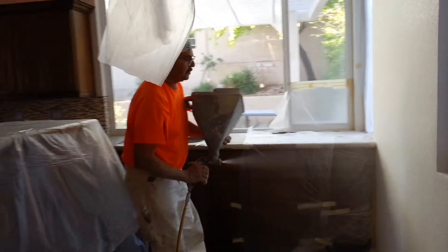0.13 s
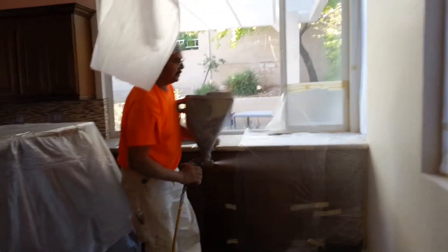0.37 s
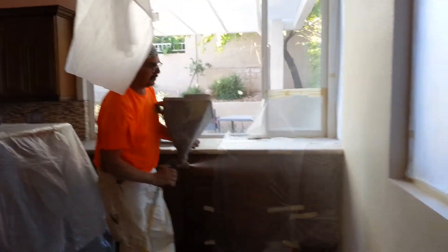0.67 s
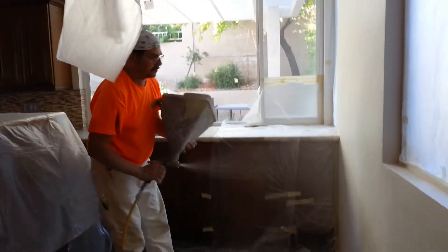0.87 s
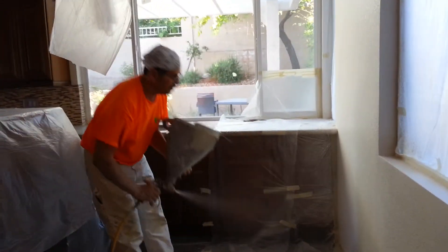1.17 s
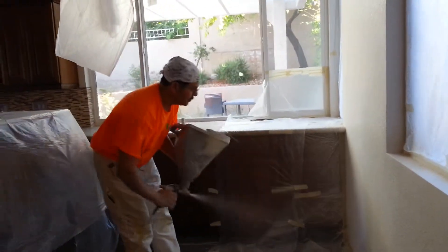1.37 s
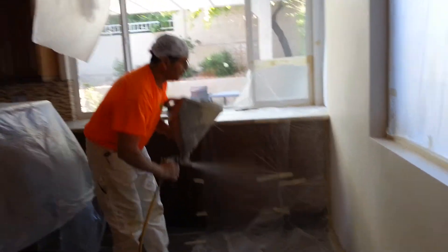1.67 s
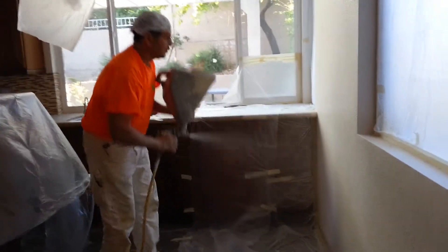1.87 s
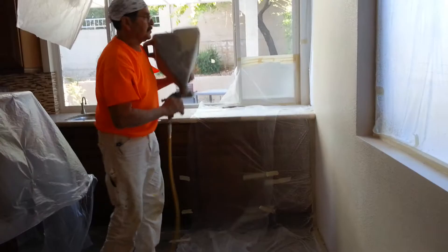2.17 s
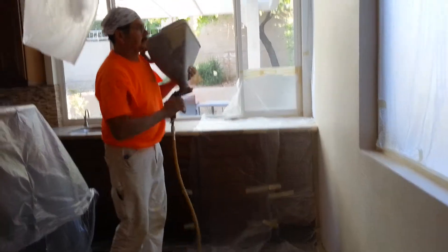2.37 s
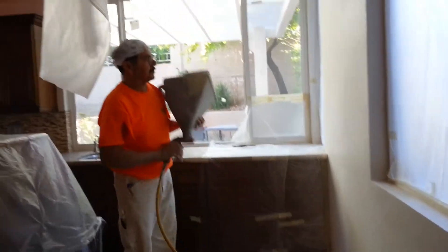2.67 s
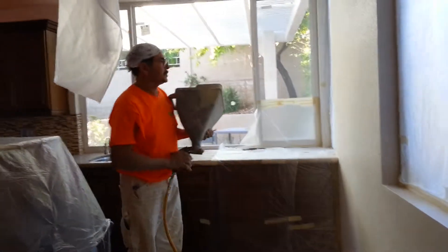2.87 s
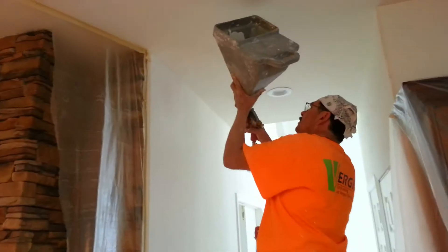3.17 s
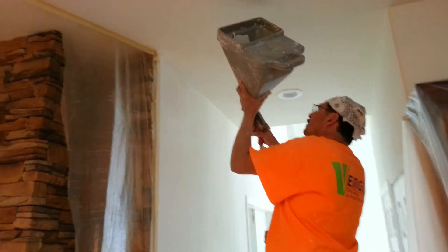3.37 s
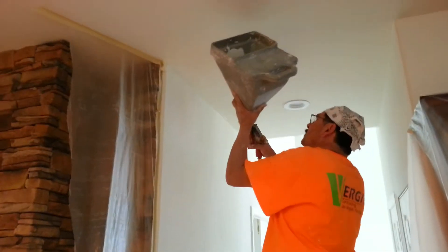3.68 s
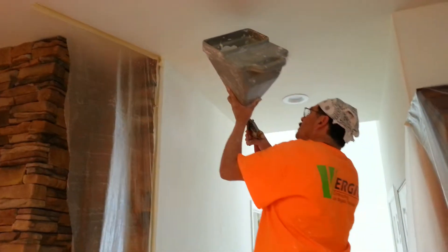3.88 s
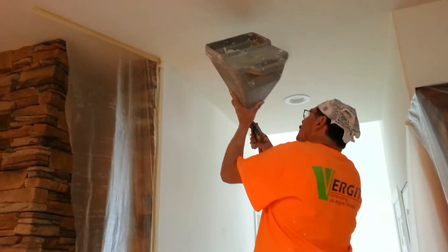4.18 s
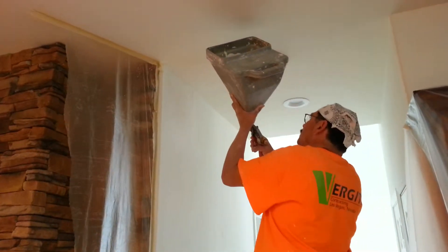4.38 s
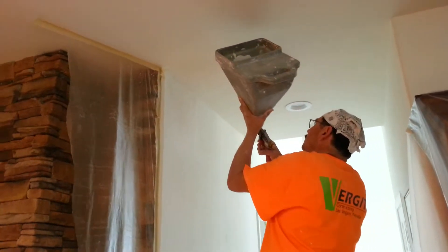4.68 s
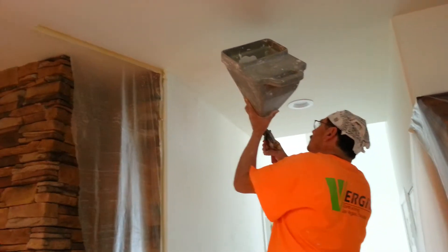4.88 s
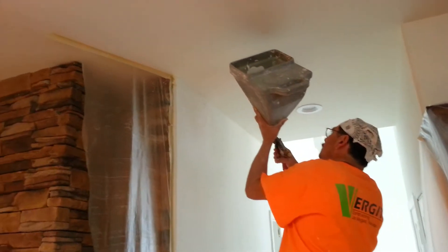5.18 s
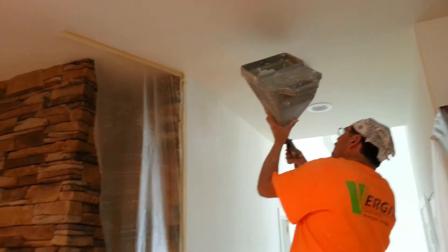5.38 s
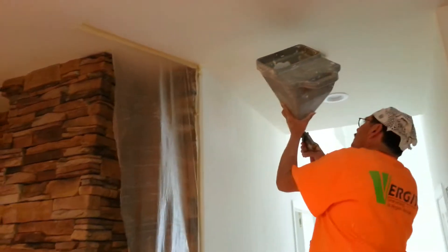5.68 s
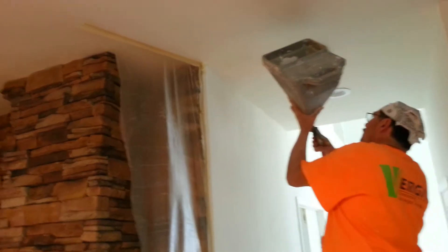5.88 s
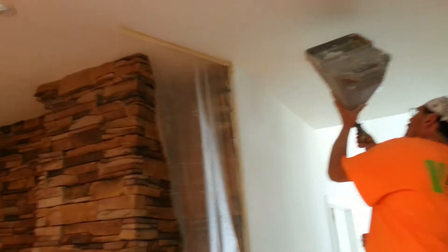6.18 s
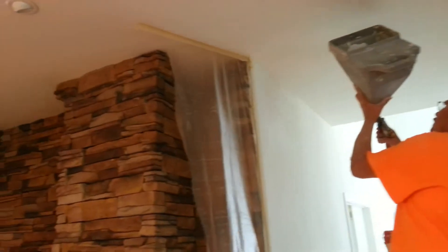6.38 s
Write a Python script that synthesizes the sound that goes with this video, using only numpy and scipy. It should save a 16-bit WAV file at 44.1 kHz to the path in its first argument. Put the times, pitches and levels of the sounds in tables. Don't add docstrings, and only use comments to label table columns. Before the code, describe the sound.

Dense bright air hiss, rough with quick irregular spits, rides over a buzzing one-cylinder motor hum. A little past two seconds it catches, bursts, then thins to bare air with a high airy whistle. An abrupt change brings steady spraying again, fuller and with heavier drone and rumble, until the end. Hard indoor room, slightly overloaded handheld stereo microphone.

```python
import sys
import numpy as np
from scipy import signal
from scipy.fft import rfft
from scipy.io import wavfile

SR = 44100
rng = np.random.default_rng(int(sys.argv[2]) if len(sys.argv) > 2 else 0)


def to_linear_factor(level_db):
    exponent = np.asarray(level_db, float) / 20
    return 10 ** exponent


def transcribe(signal):
    frames = np.atleast_2d(signal).T
    limited = np.clip(frames, -1, 1)
    pcm = np.round(limited * 32767).astype(np.int16)
    wavfile.write(sys.argv[1], SR, pcm)


N = 287973
CONTROL_STEP = 64
TRIGGER_OFF_S, CUT_S = 2.48, 3.062


def ticks():
    return np.arange(N // CONTROL_STEP + 2) * CONTROL_STEP / SR


def in_hall():
    return (ticks() > CUT_S).astype(int)


def in_time(spans):
    s, *columns = np.transpose([row for span in spans for row in span])
    return [np.interp(ticks(), s, c) for c in columns]


def full(control):
    return np.interp(np.arange(N) / CONTROL_STEP, np.arange(len(control)), control)


def at_hz(table, hz):
    f, *columns = np.transpose(table)
    return np.array([np.interp(np.log(hz), np.log(f), c) for c in columns])


def drift(rate):
    r = np.exp(-2 * np.pi * rate * CONTROL_STEP / SR)
    settle = 1500
    slow = signal.lfilter([1], [1, -2 * r, r * r], rng.standard_normal(len(ticks()) + settle))[settle:]
    return slow / np.std(slow)


def band(white, low, high):
    return signal.sosfilt(signal.butter(2, [low, high], "band", fs=SR, output="sos"), white) * np.sqrt(SR / 2)


def zone_db(table, low, high):
    power = to_linear_factor(at_hz(table, np.linspace(low, high, num=200))) ** 2
    return 10 * np.log10(power.sum(axis=0).mean() / 4 * (high - low))


def jet(spit_db, near_db, own_db, trim_db):
    # f/Hz, left/(dB per Hz), right/(dB per Hz)
    kitchen_colour = [(800, -67.5, -69.5), (1230, -65, -69.5), (2230, -63.5, -61), (3080, -61, -63.5),
                      (3910, -55, -61), (4770, -44, -57.5), (5110, -47.5, -61), (5680, -52, -52.5),
                      (7000, -59, -48), (8400, -62.5, -57.5), (10200, -66.5, -63), (10400, -70.5, -63.5),
                      (14400, -69, -69)]
    # f/Hz, left/(dB per Hz), right/(dB per Hz)
    air_colour = [(800, -67, -75), (1210, -58, -64), (2050, -57.5, -60), (3030, -61, -62.5),
                  (3700, -55.5, -66), (4640, -50, -63), (5520, -50, -73), (6370, -62, -41),
                  (6730, -53.5, -49), (8120, -67, -59.5), (9100, -70, -65.5), (11600, -75, -72),
                  (14100, -68, -73.5)]
    # f/Hz, left/(dB per Hz), right/(dB per Hz)
    hall_colour = [(805, -66.5, -70), (1190, -61.5, -73.5), (1880, -60, -65), (3090, -65, -70),
                   (3960, -56.5, -59), (5040, -41, -59.5), (5180, -49.5, -49), (6200, -48, -46.5),
                   (6950, -62, -46), (7850, -62, -55), (8760, -65.5, -62.5), (12200, -75, -70),
                   (14500, -77, -80)]
    # t/s, aim left over right/dB, slide of the hiss peak left/%, right/%
    swing = [
        [(0, 0, 1.5, 3), (.7, -1, 1, 2), (1.1, -.5, 1.5, 5.5), (1.45, -1.5, 0, -1.5), (1.95, 0, 0.5, 2.5),
         (2.25, -1, 3, 0.5), (2.47, -1.5, 8, 3), (2.52, -3.5, 4, -1), (3.05, -4.5, 5.5, 1),
         (3.07, -2.5, 1.5, 3), (3.7, -2, 1.5, 1.5), (4.2, -2, 1.5, 1.3), (4.7, -3.5, 2.5, 1),
         (5.2, -2.5, 1, 1.3), (5.8, -1, 0.7, 2), (6.53, -1.5, -0.5, 2)],
    ]
    aim, *slide = in_time(swing)

    hall = ticks() > CUT_S
    air = np.clip((ticks() - TRIGGER_OFF_S) / 0.08 + .5, 0, 1) * ~hall
    state = np.array([(1 - air) * ~hall, air, hall])
    colours = (kitchen_colour, air_colour, hall_colour)
    zones = ((1000, 3500), (4000, 8000), (9000, 14000))
    lift = []
    for level, zone in zip(jet_zones(), zones):
        colour_db = np.array([zone_db(c, *zone) for c in colours])
        lift.append(level - colour_db @ state)

    spit = drift(25.6)
    spit = spit + .3 * spit ** 2
    near = [drift(13.0) for _ in range(5)]
    white = moving_room(shared(.18), wet_db=-1, t60=0.2, change_s=0.29)
    edges, out = np.geomspace(750, 15000, num=25), np.zeros((2, N))
    for k, (low, high) in enumerate(zip(edges, edges[1:])):
        hz = np.sqrt(low * high)
        share = [np.interp(np.log(hz), np.log([2600, 5000, 7000, 10500]), w)
                 for w in ([1, 0, 0, 0], [0, 1, 1, 0], [0, 0, 0, 1])]
        common = np.dot(share, lift) + trim_db
        common = common + spit_db * spit * min(hz / 4000, 1) + near_db * near[k // 5]
        noise = band(white[k % 2], low, high)
        for side in (0, 1):
            slid_hz = hz / (1 + slide[side] / 100)
            colour = np.sum(state * [at_hz(c, slid_hz)[side] for c in colours], axis=0)
            level = common + colour + (.5 - side) * aim + own_db * drift(22.0)
            out[side] += noise[side] * full(to_linear_factor(level))
    return out


def jet_zones():
    # t/s, jet level/dB, richness (-1 to 1)
    feed = [(0, 0, -0.32), (.1, 2.5, -1.1), (.42, -1.5, -0.76), (.5, 1.5, 0.16), (1.5, 1.4, -0.5),
            (2.15, 0, 0.26), (2.6, -0.1, .1), (3.05, -2, -0.24), (3.1, 1.7, .1), (4.4, -0.2, 0.31),
            (5.2, -0.8, 0.62), (5.5, -0.8, -0.25), (6.53, -0.5, 0.11)]
    duck_share = [
        (1.1, 0.094, 0.05),
        (1.1, 0.54, 1),
    ]
    level_db, rich = in_time([feed])
    duck = ducking_db() * np.array(duck_share)[in_hall()].T
    return duck + level_db + [stage(column=2) + 1 * rich, stage(column=1), stage(column=3) - 1 * rich]


def stage(column):
    # from t/s, core/dB, spatter/dB, fizz/dB, drone let through/dB
    gun_stages = [
        (0, -19.5, -29, -33, 3.6),
        (2.222, -21.5, -37, -43.5, -5),
        (2.252, -15.5, -31.5, -29, -1.5),
        (2.455, -22, -35, -36.5, 4),
        (3.062, -22, -30, -37, 1.2),
    ]
    glide_s = (.01, .015, .015, .06, .002)
    rows = np.array(gun_stages)
    begin, after = rows[:, 0], rows[:, column]
    before = np.concatenate([after[:1], after[:-1]])
    return np.interp(ticks(), np.ravel([begin, begin + glide_s], "F"), np.ravel([before, after], "F"))


def ducking_db():
    # t/s, depth/dB
    slugs = [(0.078, 5.5), (0.139, 4), (0.222, 4.2), (0.422, 3.5), (0.644, 5), (0.775, 3.3), (0.858, 4.7),
             (0.988, 4), (1.115, 5.1), (1.267, 6.5), (1.419, 5.5), (1.511, 5.5), (1.842, 3.5), (2.068, 3),
             (2.63, 2), (2.739, 2.5), (2.856, 1.5), (3.318, 2.5), (3.618, 5), (3.762, 4), (4.245, 6.5),
             (4.432, 2.5), (4.524, 3), (4.985, 4), (5.124, 6), (5.638, 2.5), (6.069, 1.5), (6.213, 3)]
    attack_s, release_s = 0.012, 0.029
    s, depth_db = np.transpose(slugs)
    late = ticks()[:, None] - s
    falling = np.clip(1 + late / attack_s, 0, 1)
    recovering = np.exp(-np.maximum(late, 0) / release_s)
    return -np.where(late < 0, falling, recovering) @ depth_db


def shared(alike):
    common = rng.standard_normal((2, 1, N))
    separate = rng.standard_normal((2, 2, N))
    return np.sqrt(alike) * common + np.sqrt(1 - alike) * separate


def moving_room(white, wet_db, t60, change_s):
    size = 8192
    frames = signal.stft(white, nperseg=size)[2]
    tail = to_linear_factor(-60 * np.arange(size // 2) / (t60 * SR))
    fresh = rfft(rng.standard_normal((2, frames.shape[-1], size // 2)) * tail, size)
    keep = np.exp(-size / 2 / SR / change_s)
    diffuse = signal.lfilter([np.sqrt(1 - keep ** 2)], [1, -keep], fresh, axis=1) / np.linalg.norm(tail)
    wet = signal.istft(frames * (1 + to_linear_factor(wet_db) * diffuse.transpose(0, 2, 1)), nperseg=size)[1][..., :N]
    return wet / np.std(wet)


def whistle():
    # f/Hz, width/Hz, left level/dB, right level/dB
    lip_tones = [
        (6950, 220, -25, -20),
        (6440, 140, -31, -29),
    ]
    t, out = np.arange(N) / SR, np.zeros((2, N))
    for hz, width, left_db, right_db in lip_tones:
        r = np.exp(-np.pi * width / SR)
        tone = rng.standard_normal((2, N))
        for _ in range(2):
            tone = signal.lfilter([1, 0, -1], [1, -2 * r * np.cos(2 * np.pi * hz / SR), r * r], tone)
        out += tone / np.std(tone) * to_linear_factor([[left_db], [right_db]])
    return out * np.clip((t - TRIGGER_OFF_S) / 0.056, 0, 1) * (t < CUT_S)


def drone(sway_db, trim_db):
    # multiple, kitchen level/dB, kitchen change/dB, hall level/dB, hall change/dB
    order_levels = [(2, -44.5, -4.5, -38, -1.5), (3, -35, -4, -40, 0), (4, -45.5, -1, -41, 1),
                    (5, -30, 2.5, -31, 1), (6, -36.5, -5, -24, -5.5), (7, -30.5, -4, -32, 7.5),
                    (8, -37.5, -3, -30, -11), (9, -38.5, -1.5, -32, 8.5), (10, -33.5, -1.5, -20, -7),
                    (11, -33, -2, -28, -0.5), (12, -44.5, 4, -28, -3), (13, -35, -8, -36.5, 9),
                    (14, -37, 4.5, -33, 11.5), (15, -39.5, 1.5, -38, -15), (16, -45, -4, -47.5, 10),
                    (17, -42, -4, -43.5, 4), (18, -45, -5, -36, -7.5), (19, -44, -5, -50, 3),
                    (21, -48, -12, -39.5, -6), (23, -46, -2, -39, -1), (24, -51, -3, -38, 4),
                    (25, -50, -7, -34, -1.5), (30, -38.5, -29, -71, -11), (32, -61, -3, -37.5, -3.5)]
    # multiple, kitchen left over right/dB, left lead/rad, hall left over right/dB, left lead/rad
    order_ports = [(2, -1, .1, -1, .2), (3, 1, .2, 0, .3), (4, 0, -.5, -1, .1), (5, 1, -.4, 3, .8),
                   (6, -3, .7, 4, .5), (7, -3, .4, 2, -1.1), (8, -1, -.1, 2, -.1), (9, 4, .2, 8, 2.7),
                   (10, 2, .1, 3, .3), (11, -1, .7, 3, -.1), (12, 7, -1.5, 0, -.4), (13, 2, -.3, -6, 1.2),
                   (14, -1, -2.7, 5, -1.0), (15, 4, -1.0, 7, .8), (16, 9, -.7, -5, -1.3),
                   (17, -2, -.4, -2, .5), (18, -11, -2.3, 5, -.4), (19, -5, -.3, -4, 1.7),
                   (21, -5, -1.6, -2, 1.9), (23, 4, 2.5, 10, -1.5), (24, -6, -.1, -3, 2.6),
                   (25, -10, -.4, -3, 1.9), (30, -1, -2.2, -3, -.9), (32, 5, 2.8, -2, 1.6)]
    # t/s, share of the way to the far end
    mic_walk = [
        [(0, 1.2), (.35, .9), (.8, 0.15), (1.4, 0.13), (3.06, 0.014), (3.065, 0.28), (3.9, -0.013),
         (5.5, 0.0049), (5.9, 0.37), (6.53, 1.07)],
    ]
    strokes_hz = np.array((53.27, 53.21))
    lead_kept_far = np.array((.1, 0.91))
    sweep, upper_lag, scatter = np.array((.18, -.23)), np.array((2.0, -1.8)), .15
    upper_from, inverted_from = np.array((9, 7)), np.array((13, 12))

    t = np.arange(N) / SR
    hall, place = (t > CUT_S).astype(int), in_hall()
    walk, = in_time(mic_walk)
    cycle = 2 * np.pi * strokes_hz[hall] * t + 0.0082 * full(drift(6.2))
    doorway_db = place * 4.0 * np.exp(-((ticks() - CUT_S) / .9) ** 2)
    kept = full(1 - (1 - lead_kept_far[place]) * np.clip(walk, 0, 1))
    out = np.zeros((2, N))
    for (k, *levels), (_, *ports) in zip(order_levels, order_ports):
        k = round(k)
        db, change_db = np.reshape(levels, (2, 2)).T
        pan, lead = np.reshape(ports, (2, 2)).T
        level = db[place] + change_db[place] * walk + (k > 24) * doorway_db + sway_db * drift(2.5)
        start = sweep * (k - 6) ** 2 + upper_lag * np.maximum(k - upper_from, 0)
        start = start + np.pi * (k >= inverted_from) + scatter * rng.standard_normal(2)
        centred = 20 * np.log10(np.cosh(pan * np.log(10) / 40))
        for side, sign in enumerate((.5, -.5)):
            gain = full(to_linear_factor(level + (sign * pan - centred)[place]))
            out[side] += gain * np.cos(k * cycle + start[hall] + sign * lead[hall] * kept)
    return to_linear_factor(trim_db) * np.sqrt(2) * out


def rumble(level_db, patchy_db):
    # f/Hz, left/(dB per Hz), right/(dB per Hz)
    rumble_colour = [(30, -76, -77), (50, -77, -79), (75, -69, -66), (154, -65.5, -61), (407, -57.5, -54.5),
                     (800, -66, -52.5), (1200, -88, -91)]
    # f/Hz, likeness (0 to 1)
    likeness = [
        (40, 0.57),
        (150, 0.16),
        (400, 0.42),
        (900, 0.071),
    ]
    edges, white, out = np.geomspace(25, 1000, num=12), rng.standard_normal((2, 2, N)), np.zeros((2, N))
    for k, (low, high) in enumerate(zip(edges, edges[1:])):
        hz = np.sqrt(low * high)
        mid, side = band(white[k % 2], low, high)
        alike = np.clip(at_hz(likeness, hz)[0], -1, 1)
        pair = (np.sqrt(1 + alike) * mid + np.sqrt(1 - alike) * side * [[1], [-1]]) / np.sqrt(2)
        out += pair * to_linear_factor(at_hz(rumble_colour, hz))[:, None] * full(to_linear_factor(patchy_db * drift(1.8)))
    hall_db = np.where(np.arange(N) / SR > CUT_S, 1.5, 0)
    return out * to_linear_factor(level_db + hall_db)


def scene():
    gun = jet(spit_db=1.12, near_db=0.74, own_db=0.76, trim_db=4.0) + whistle()
    compressor = drone(sway_db=0.95, trim_db=0.66) + rumble(level_db=-3.5, patchy_db=2.5)
    return gun + full(to_linear_factor(stage(column=4) + 1.16 * ducking_db())) * compressor


def low_pass(x):
    return signal.sosfilt(signal.butter(12, 15670, fs=SR, output="sos"), x)


def record(dry):
    over = np.maximum(20 * np.log10(np.abs(dry).max(axis=0) + 1e-9) + 3.06, 0)
    fall = 160 * np.arange(N) / SR
    duck = np.maximum.accumulate(over + fall) - fall
    duck = signal.lfilter([.02], [1, -.98], duck)
    ducked = dry * to_linear_factor(-.6 * duck)
    held = ducked / (1 + np.abs(ducked / .93) ** 6) ** (1 / 6)
    mix = signal.sosfilt(signal.ellip(10, .5, 70, 14560, fs=SR, output="sos"), held)
    return low_pass(mix)


dry = scene()
out = record(dry)
transcribe(out)
```